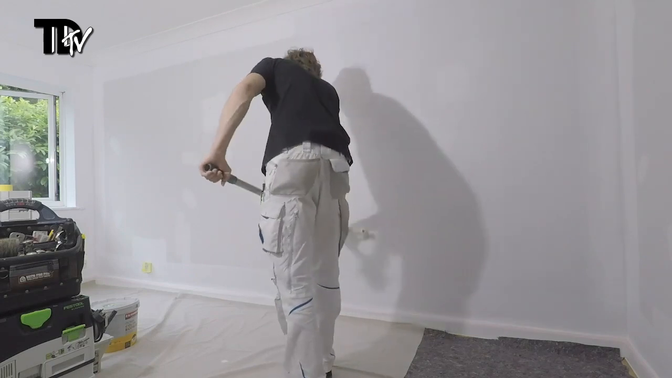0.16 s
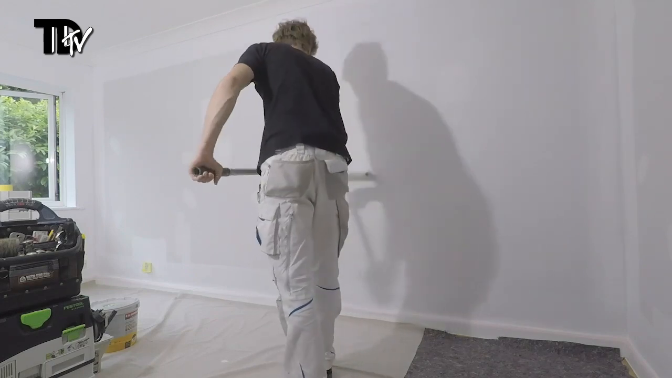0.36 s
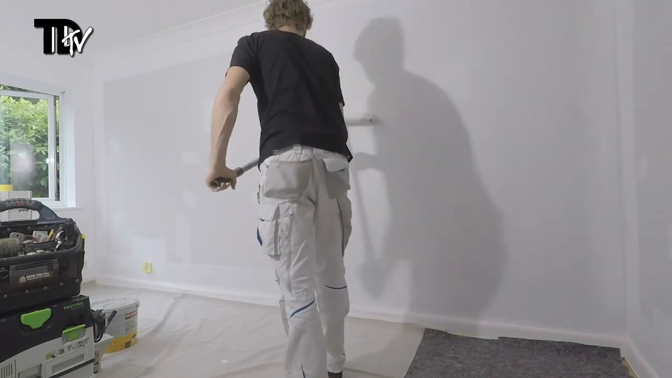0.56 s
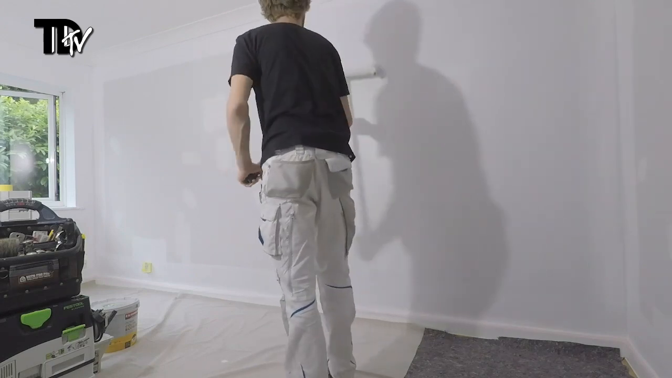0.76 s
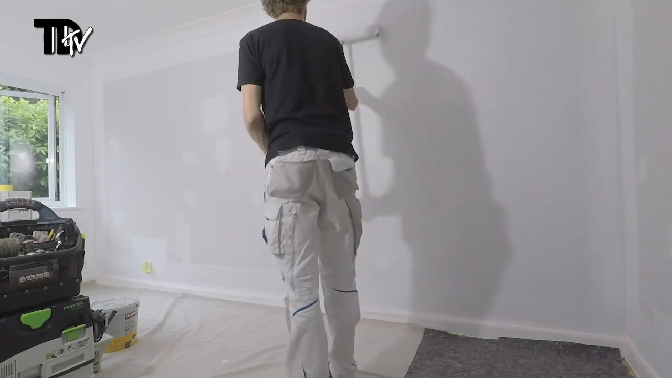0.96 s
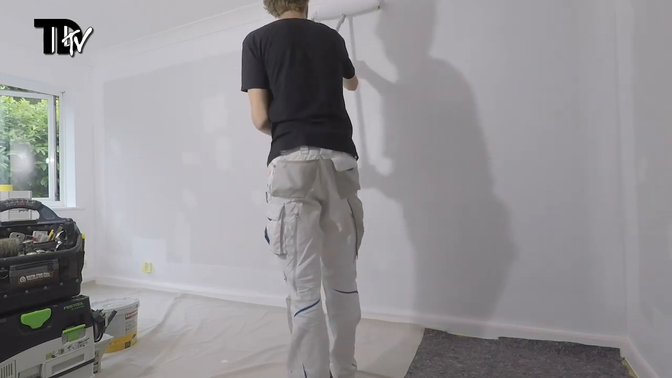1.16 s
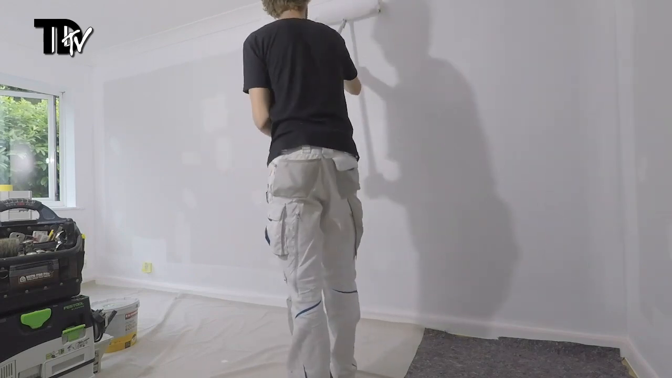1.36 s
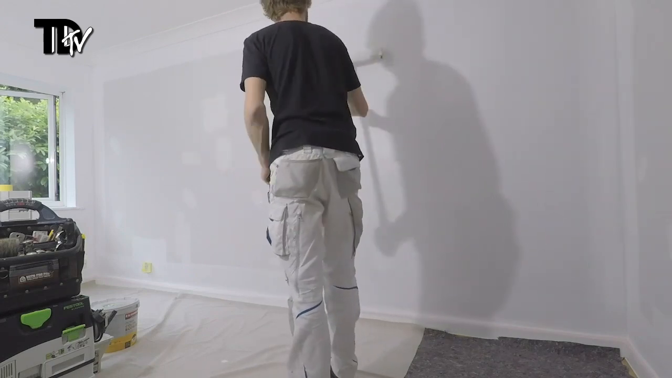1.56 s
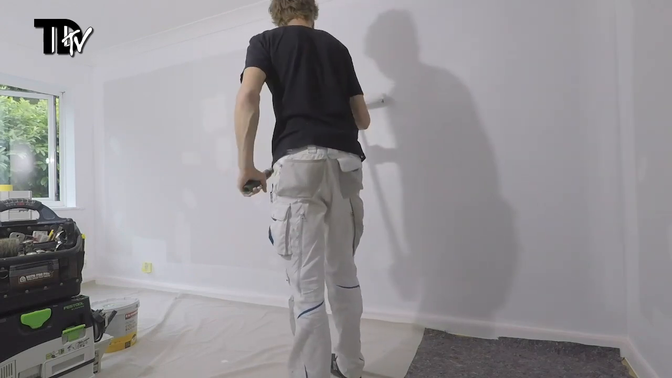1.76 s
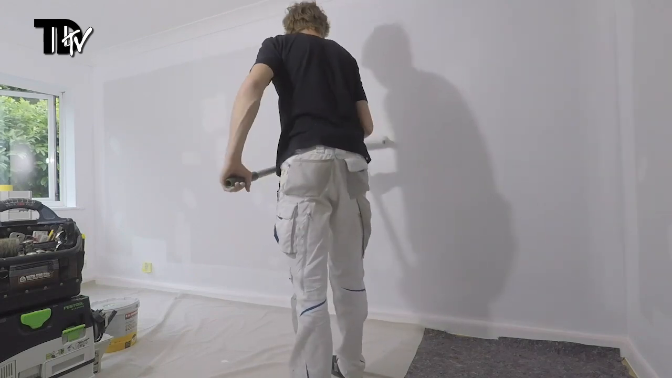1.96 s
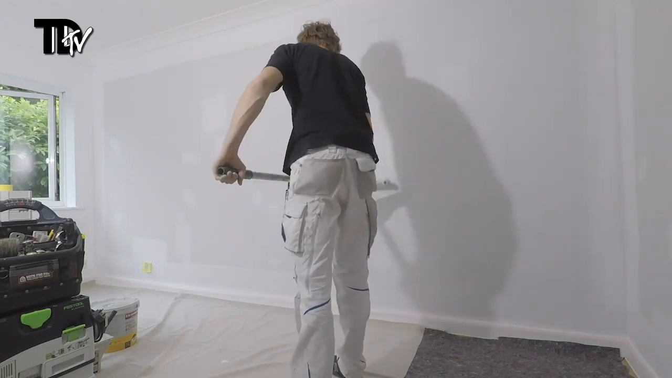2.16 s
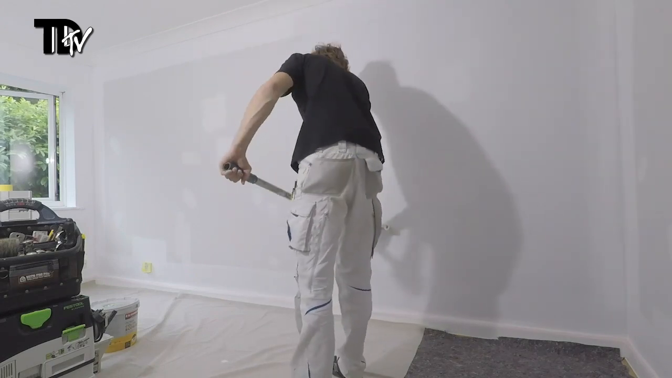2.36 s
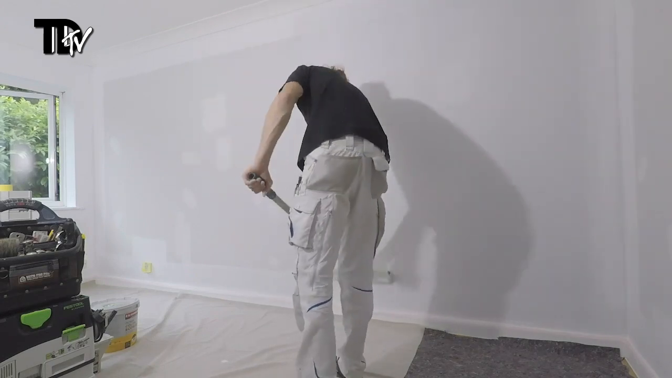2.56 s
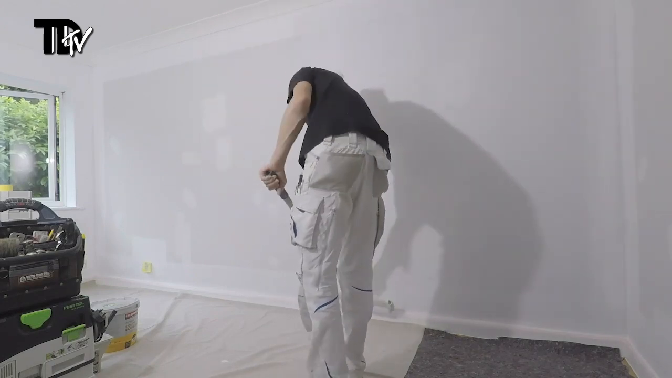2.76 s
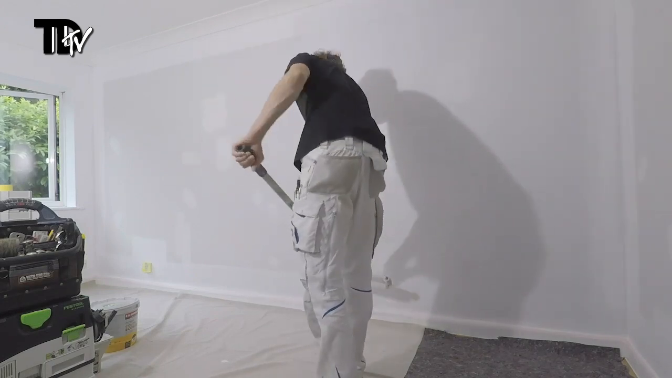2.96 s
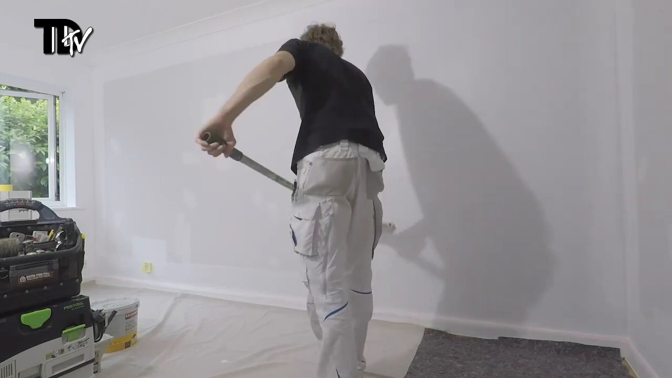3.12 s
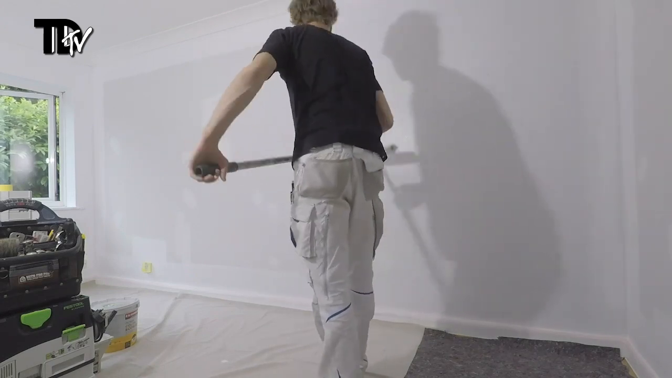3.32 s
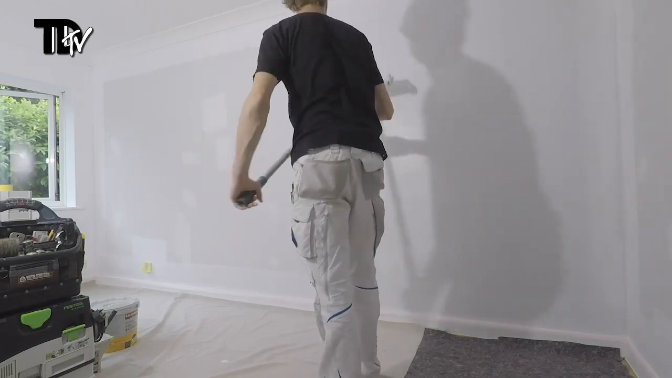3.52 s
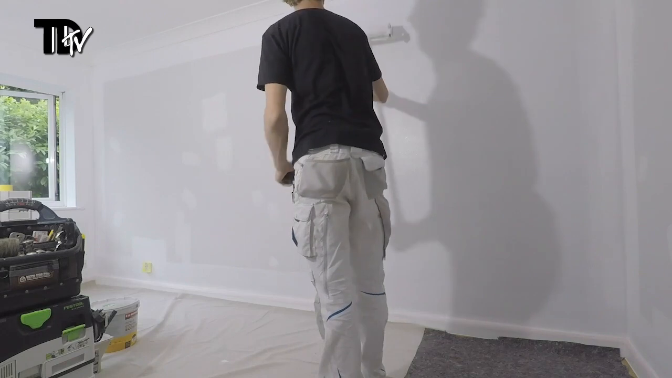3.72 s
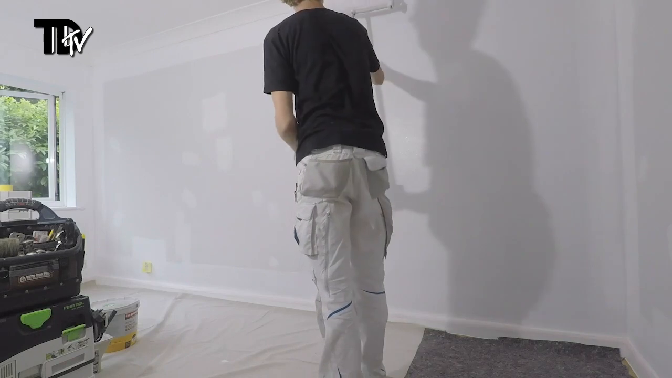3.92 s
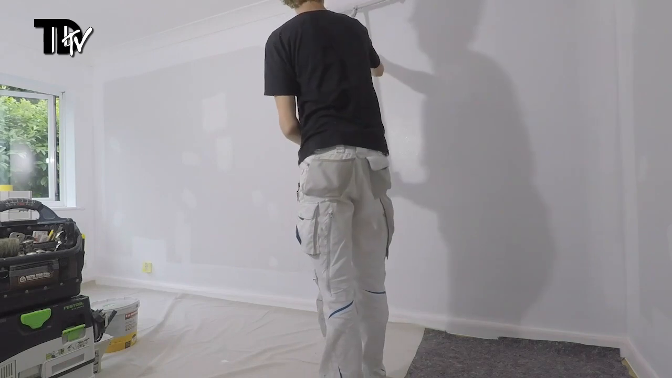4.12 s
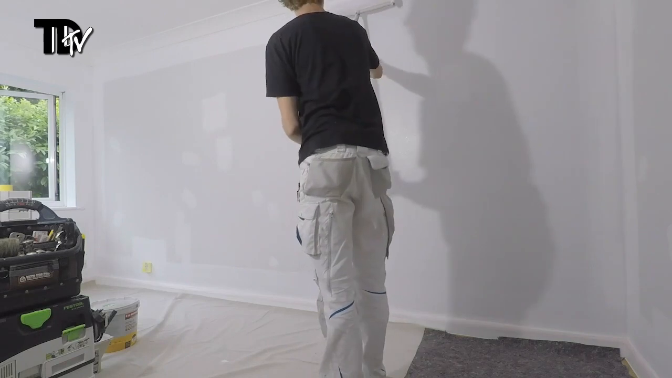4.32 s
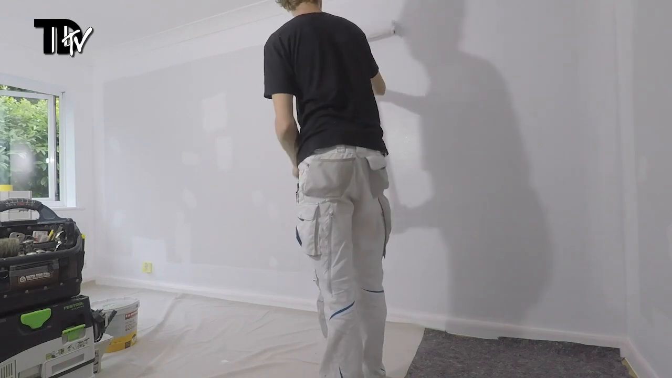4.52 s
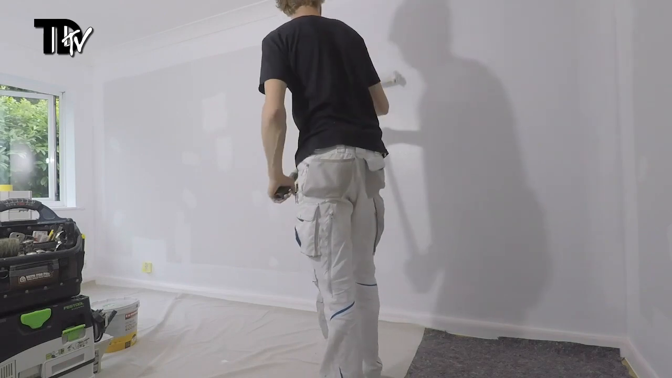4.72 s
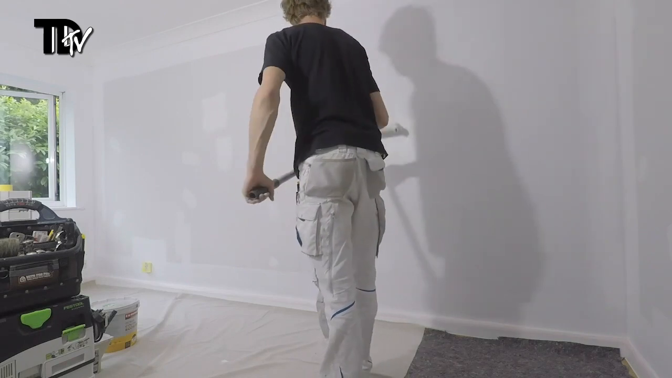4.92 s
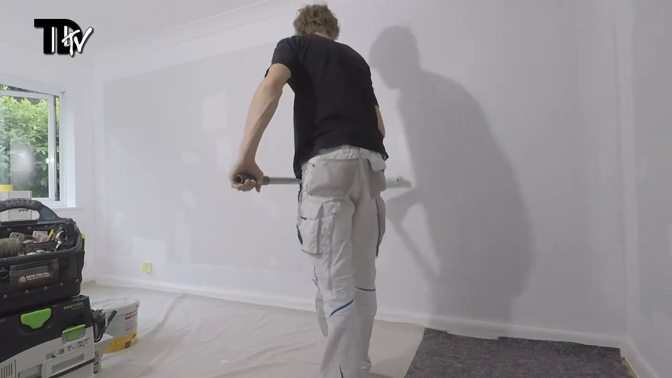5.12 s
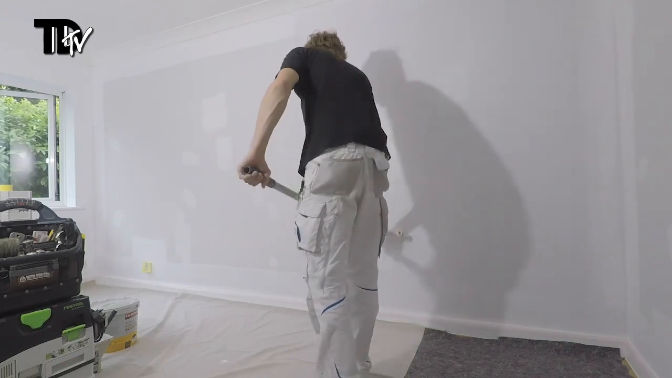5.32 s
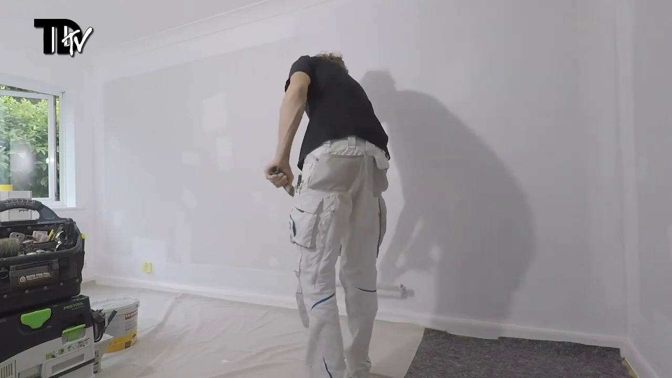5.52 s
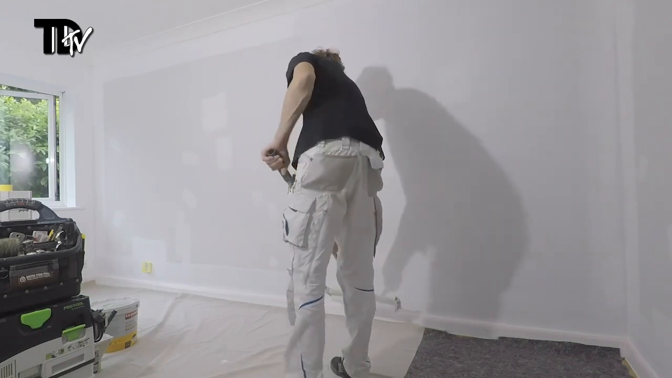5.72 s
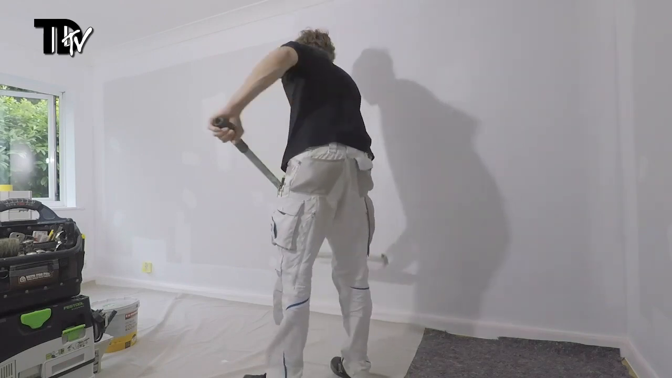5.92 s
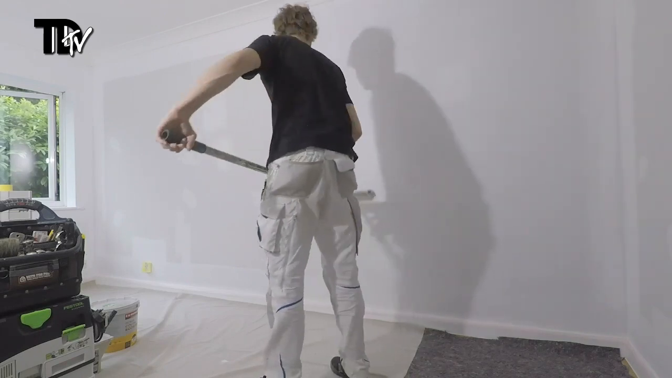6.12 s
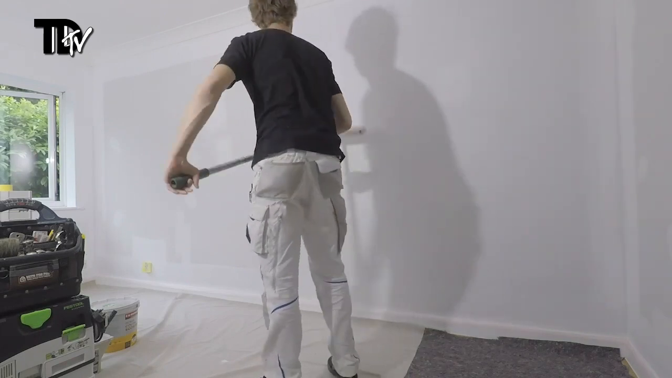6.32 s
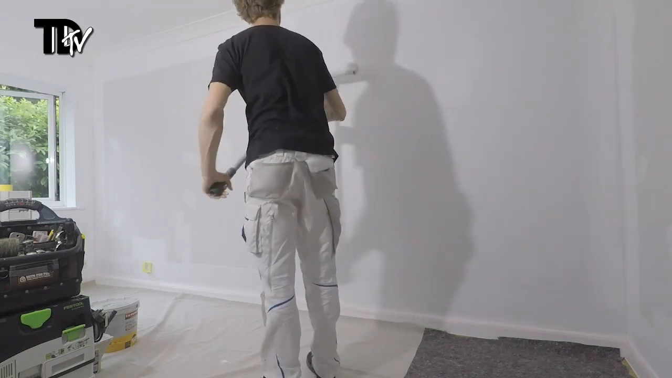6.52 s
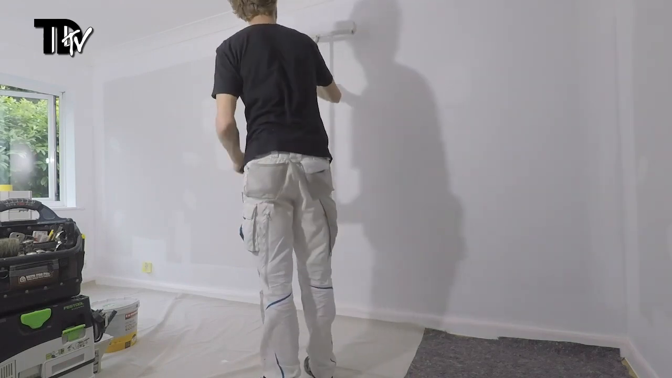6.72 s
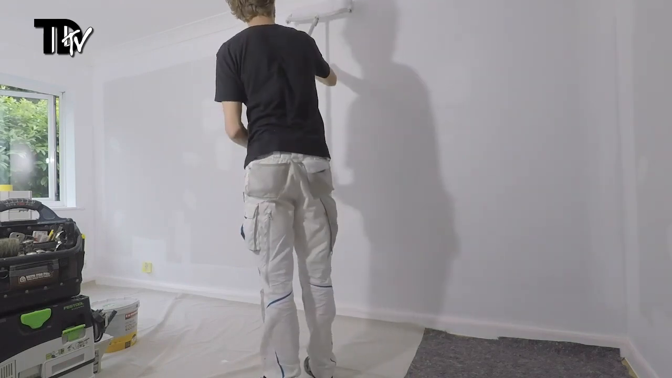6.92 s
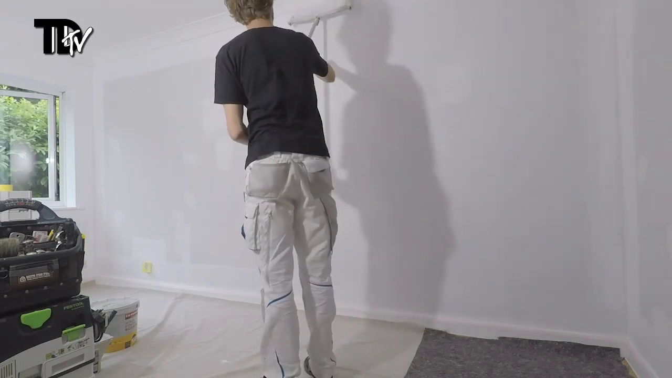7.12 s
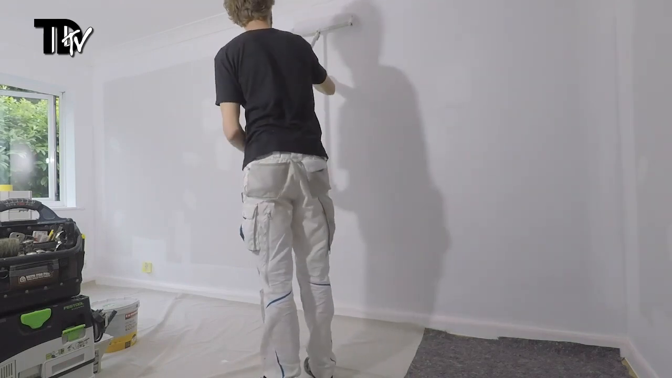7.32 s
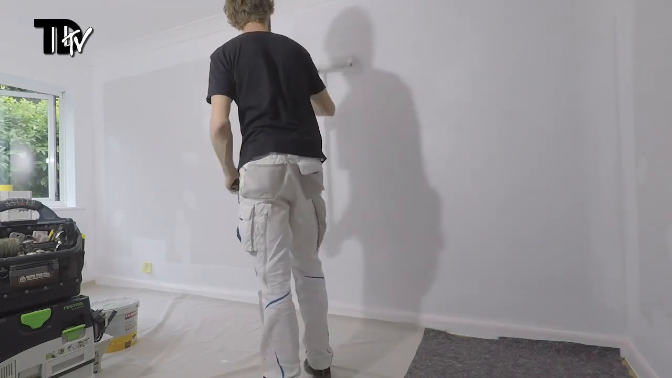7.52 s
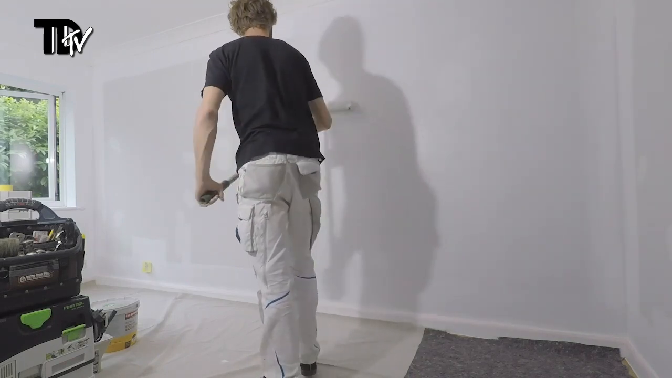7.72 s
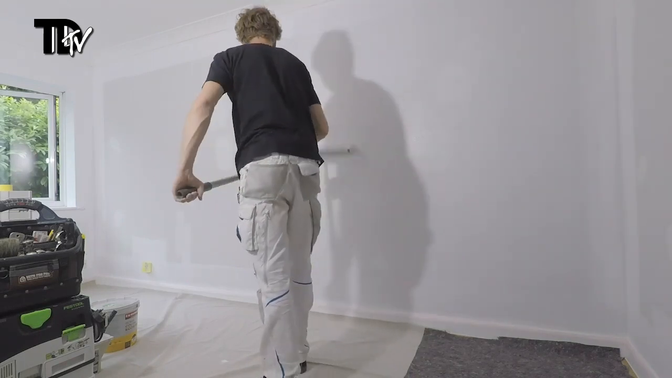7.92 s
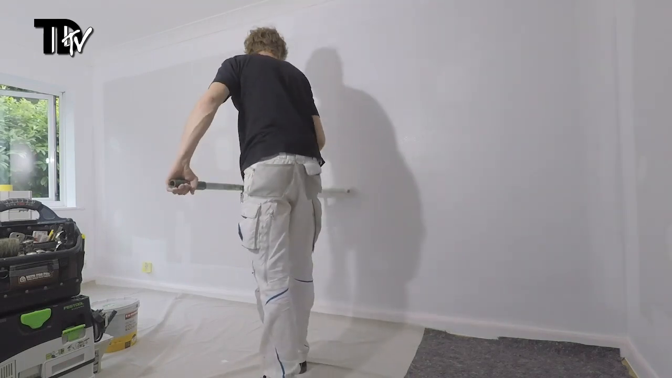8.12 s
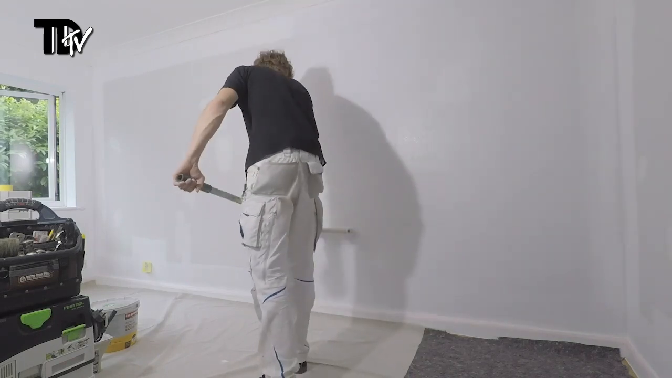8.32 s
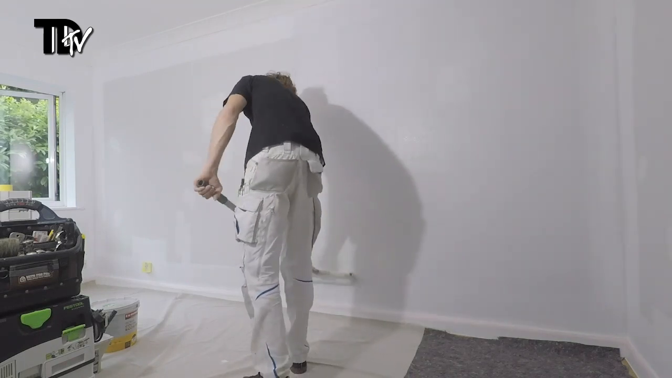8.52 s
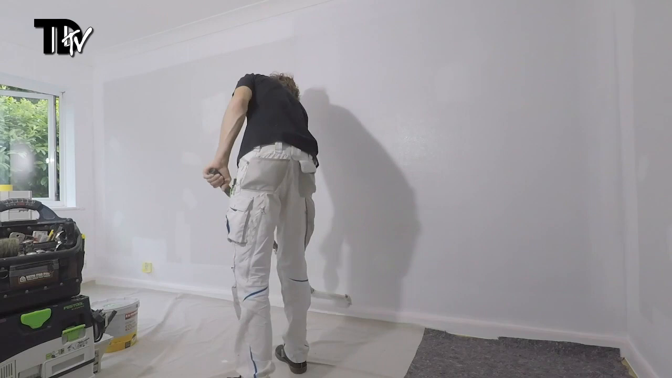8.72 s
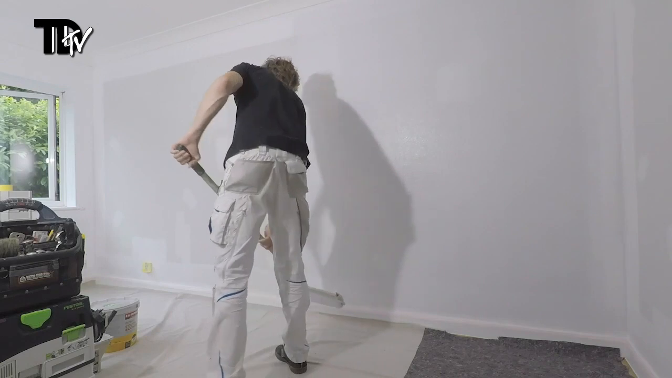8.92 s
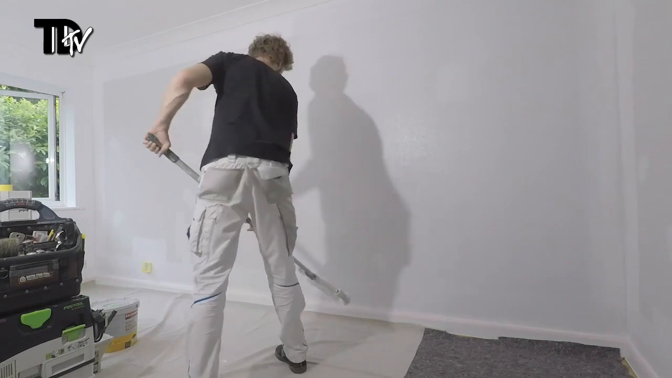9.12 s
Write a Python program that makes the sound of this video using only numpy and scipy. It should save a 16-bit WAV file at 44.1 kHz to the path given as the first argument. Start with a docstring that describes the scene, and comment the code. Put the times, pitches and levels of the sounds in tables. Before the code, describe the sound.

In a bare, slightly echoing room, a fixed microphone hears wet paint being rolled onto a wall from close by. The roller hisses and crackles through an up stroke and a down stroke, then stops for a pole bump, rustling cloth and muffled footsteps. Its frame clacks into a second down stroke and, after more steps, a third. Near the end the lifted pole gives its loudest hollow bump.

```python
"""A bare room, heard from one fixed stereo microphone, near enough for the roller to stand out of its echoes.
A decorator rolls wet paint up the wall and straight down again: paint threads snap and hiss behind the
sleeve, the nap squelches, the wall drums. At 3 s the pole bumps, cloth scuffs and he steps along the dust
sheet. The frame clacks and the sleeve slaps into a second down stroke at 4.3 s and, after more steps,
a third at 7.2 s. At 9.1 s the lifted pole gives its loudest bump."""
import sys
import numpy as np
from scipy import signal
from scipy.fft import rfft, irfft, next_fast_len
from scipy.io import wavfile

SR = 44100
rng = np.random.default_rng(int(sys.argv[2]) if len(sys.argv) > 2 else 0)


def transcribe(u):
    """Save the signal u as a 16-bit wav file named by the first command-line argument.

    u: samples, shape (n,) or (channels, n), limited to [-1, 1]; the rate is SR.
    q: integer samples, one column per channel.
    """
    v = np.clip(np.atleast_2d(u).T, -1, 1)
    q = np.round(v * 32767).astype(np.int16)
    wavfile.write(sys.argv[1], SR, q)


N = 408353
TIME = np.arange(N) / SR


def from_db(db):
    """Decibels to gain."""
    return np.exp(np.asarray(db) * (np.log(10) / 20))


def rms_one(x):
    """Scale to unit rms."""
    return x / np.sqrt(np.mean(x ** 2) + 1e-20)


def at_hz(points, hz):
    """Read a table along a log-frequency axis."""
    table = np.array(points)
    return np.interp(np.log(hz + 1e-3), np.log(table[:, 0]), table[:, 1])


def coloured(x, spectrum):
    """Give a steady sound a spectrum; rms 1."""
    size = next_fast_len(N)
    hz = np.arange(size // 2 + 1) * SR / size
    return rms_one(irfft(rfft(x, size) * from_db(at_hz(spectrum, hz)), size)[:N])


def droning(resonances):
    """Noise through parallel resonances; rms 1."""
    out = 0
    for hz, width, db in resonances:
        radius = np.exp(-np.pi * width / SR)
        poles = [1, -2 * radius * np.cos(2 * np.pi * hz / SR), radius * radius]
        noise = rng.standard_normal(N + SR // 2)
        out = out + from_db(db) * signal.lfilter([1 - radius, 0, radius - 1], poles, noise)[-N:]
    return rms_one(out)


# Room tone, the still air of the house: f/Hz, level/dB
AIR_SPECTRUM = [(15, -32), (25, -5), (86, -15.5), (118, -13), (231, -10.5), (264, -17), (344, -12.5),
                (604, -17), (655, -17), (790, -17), (952, -17.5), (1240, -20.5), (2070, -25), (2240, -25),
                (15000, -35.5)]
# Low resonances of the room: f/Hz, width/Hz, level/dB
HUM_MODES = [(38.6, 4.5, 5.5), (70, 8.4, -3.5), (96.6, 5, -5.5), (301.2, 5.5, -5.5), (348, 6, -9)]
def air():
    """Quiet air at the microphone, with the room's low hum."""
    tone = coloured(rng.standard_normal(N), AIR_SPECTRUM)
    return from_db(-46.5) * tone + from_db(-48.5) * droning(HUM_MODES)


# Faint noise in the side channel: f/Hz, level/dB
SIDE_SPECTRUM = [(30, 6), (200, -2), (450, -13), (1200, -26), (4000, -33.5), (15000, -34)]
def faint_width():
    """A very faint, mostly low noise that differs between left and right."""
    return from_db(-67) * coloured(rng.standard_normal(N), SIDE_SPECTRUM)


# Reverberation of the bare room: f/Hz, t60/s
ROOM_T60 = [(80, 0.5), (400, 0.79), (1500, 0.71), (5000, 0.77), (14000, 0.39)]
def room_echoes(first_echo_s):
    """Diffuse echoes off the bare walls, the top octave dying first; energy 1."""
    t, tail = TIME[:SR], 0
    octave_edges = 40 * 2. ** np.arange(10)
    for low, high in zip(octave_edges, octave_edges[1:]):
        octave = signal.butter(2, [low, high], "band", fs=SR, output="sos")
        t60 = at_hz(ROOM_T60, np.sqrt(low * high))
        tail = tail + signal.sosfilt(octave, rng.standard_normal(SR)) * from_db(-60 * t / t60)
    tail = tail * np.clip(t / first_echo_s - 1, 0, 1)
    return tail / np.sqrt(np.sum(tail ** 2))


def in_room(x, echoes, wet_db):
    """Direct sound plus its echoes; more echo sounds farther from the microphone."""
    return x + from_db(wet_db) * signal.fftconvolve(x, echoes)[:N]


def bell(t, peak_s, rise_s, fall_s):
    """A smooth swell from 0 to 1 and back."""
    width_s = np.where(t < peak_s, rise_s, fall_s)
    return np.exp(-np.minimum(((t - peak_s) / width_s) ** 2, 50))


# Runs of the roller over the wall: direction, touch t/s, push t/s, rise/s, slackest t/s, slack/dB,
# lift t/s, hiss level/dB, wetness/dB, flexing level/dB, extra drumming/dB
ROLLER_STROKES = [("up", -.11, -.11, 0.11, 1.32, 5.9, 1.233, -18, 1.7, -36, .6),
                  ("down", 1.337, 1.344, 0.047, 2.455, 2.8, 2.713, -19.0, 0, -41.5, -2),
                  ("down", 4.345, 4.363, 0.12, 5.37, 2.5, 5.584, -17.5, 0, -37, 2),
                  ("down", 7.195, 7.245, .119, 8.15, 0.81, 8.635, -18.5, -0.66, -36.5, -1.2)]
def stroke_gains():
    """Push, speed and height set the gains of hiss, sheen, squelch, spray, flexing and drumming."""
    touch_db, drying_db_per_s = -21.3, 1.17
    squelch_db, foot_db, spray_db, drum_db = -15, 0.66, -13.84, -41.8
    hiss_fall, sheen_fall, squelch_fall, spray_fall, wall_fall = 105, 33, 84, 196, 40  # dB/s once lifted
    t, gains = TIME[::64], 0
    for stroke in ROLLER_STROKES:
        _, touch, push, rise_s, slackest, slack_db, lift, level_db, wet_db, flex_db, extra_db = stroke
        age, lifted = np.maximum(t - push, 0), np.clip(t - lift, 0, 2)
        contact = np.clip((t - touch) / .01 + 1, 0, 1)
        # the push builds from a light touch and slackens as the arms run out of reach
        push_db = touch_db * np.exp(-age / rise_s) - slack_db * bell(t, slackest, rise_s=.43, fall_s=.15)
        # the hiss thins as the sleeve gives up its paint, and darkens as it dies
        hiss = level_db + push_db - drying_db_per_s * age - hiss_fall * lifted
        sheen = hiss - sheen_fall * lifted
        # a wetter sleeve squelches more and sprays less
        squelch = level_db + squelch_db + wet_db + foot_db * (1 - height(t))
        squelch += 1.15 * push_db - squelch_fall * lifted
        bite_db = 6.5 * np.exp(-age / .43)  # extra spray as the sleeve first bites
        spray = level_db + spray_db - wet_db / 2 + bite_db + 1.34 * push_db - spray_fall * lifted
        # the roller gathers speed and slows again; the wall is quieter when it is slow
        slow = 1 - bell(t, push + .57, rise_s=0.2, fall_s=0.4)
        load_db = 0.73 * push_db - wall_fall * lifted
        flex = flex_db - 8.5 * slow + load_db
        drum = drum_db + extra_db - 5.5 * slow + load_db
        gains = gains + contact * from_db([hiss, sheen, squelch, spray, flex, drum])
    return [np.interp(TIME, t, gain) for gain in gains]


def height(t):
    """Where the roller is on the wall: 0 at the foot, 1 at the top."""
    ends = []
    for way, _, push, _, _, _, lift, *_ in ROLLER_STROKES:
        ends += [(push, way == "down"), (lift, way == "up")]
    return np.interp(t, *np.transpose(ends))


def drift(rate):
    """A random wander that turns about rate times a second; rms 1."""
    knots = rng.standard_normal(8192)
    return rms_one(np.interp(TIME * rate, np.arange(len(knots)), knots))


def snapping(per_s, size_db):
    """Threads let go at random moments; size_db spreads the sizes of their clicks; rms 1."""
    sizes = from_db(size_db * np.minimum(rng.exponential(1, N), 6)) * rng.choice([-1, 1], N)
    return rms_one(sizes * (rng.random(N) < per_s / SR))


def hollow_note(width_hz, foot_hz=920, top_hz=730):
    """Noise rings in the tube of the sleeve, lower in pitch the higher it is on the wall; rms 1."""
    centre_hz = foot_hz + (top_hz - foot_hz) * height(TIME)
    lowpass = signal.butter(2, width_hz / 2, fs=SR, output="sos")
    slow_noise = signal.sosfilt(lowpass, rng.standard_normal((2, N)))
    phase = 2 * np.pi * np.cumsum(centre_hz) / SR
    return rms_one(slow_noise[0] * np.cos(phase) + slow_noise[1] * np.sin(phase))


# Coarse, fine and finest paint threads as they sound at the microphone: f/Hz, level/dB
SQUELCH_SPECTRUM = [(120, -15.5), (250, -8), (400, -5.5), (560, -4), (700, -1.5), (950, -2), (1300, -4.5),
                    (1900, -9.5), (3500, -26)]
HISS_SPECTRUM = [(600, -20), (1300, -13), (2000, -7.5), (2800, -4.5), (4000, -3), (4800, -2), (5800, 0),
                 (7200, -0.5), (8000, -1), (8900, -1.7), (9700, -10), (10800, -22), (13000, -36)]
SPRAY_SPECTRUM = [(8000, -34), (9800, 2), (11000, 1.5), (12800, 0.5), (14000, -2), (15200, -8),
                  (17000, -16)]
def roller(echoes, hiss, sheen, squelch, spray, sheen_hz=4240):
    """Paint threads snap as the sleeve peels off the wet wall, unevenly because the nap has clumps."""
    clumps = from_db(0.57 * drift(14) + 0.7 * drift(40) + 0.33 * drift(170))
    fine = clumps * (snapping(per_s=11000, size_db=2) + from_db(1) * rng.standard_normal(N))
    coarse = clumps * (snapping(per_s=3500, size_db=0) + from_db(-0.5) * rng.standard_normal(N))
    # movement blurs most echoes into the noise above; a weak part stays put and ripples the spectrum
    fine, coarse = in_room(fine, echoes, wet_db=-14.5), in_room(coarse, echoes, wet_db=-9.5)
    full = coloured(fine, HISS_SPECTRUM)
    dull = signal.sosfilt(signal.butter(1, sheen_hz, fs=SR, output="sos"), full)
    bright = hiss * dull + sheen * (full - dull) + spray * coloured(fine, SPRAY_SPECTRUM)
    wet_nap = from_db(-0.76) * coloured(coarse, SQUELCH_SPECTRUM)
    tube = from_db(-10.5) * hollow_note(width_hz=170)
    return bright + squelch * (wet_nap + tube)


# Resonances of the wall under the roller: f/Hz, width/Hz, level/dB
FLEX_MODES = [(39.5, 7.5, 8), (49, 8.6, 2.5), (63, 5.7, 0)]
DRUM_MODES = [(79.5, 7, 0), (103, 8, -4), (114.3, 7.6, 2.5), (169, 13, -5.5), (195.8, 13, -1)]
def wall(flex, drum):
    """The turning sleeve flexes the wall and drums on it."""
    return flex * droning(FLEX_MODES) + drum * droning(DRUM_MODES)


def struck(modes, bright_hz):
    """One blow: each mode rings with its own strength, and a soft contact mutes the upper ones; peak 1."""
    hz, db, t60 = np.transpose(modes)[:, :, None]
    t = TIME[:int(SR * min(t60.max(), 1))]
    strength = from_db(db + 2 * rng.standard_normal(hz.shape)) * rng.choice([-1, 1], hz.shape)
    blow = np.sum(strength * from_db(-60 * t / t60) * np.sin(2 * np.pi * hz * t), axis=0)
    blow = signal.sosfilt(signal.butter(2, bright_hz, fs=SR, output="sos"), blow)
    return blow / np.abs(blow).max()


def crack(low_hz, high_hz, fall_s):
    """A short burst of contact noise; peak 1."""
    band = signal.butter(2, [low_hz, high_hz], "band", fs=SR, output="sos")
    burst = signal.sosfilt(band, rng.standard_normal(SR // 8) * np.exp(-TIME[:SR // 8] / fall_s))
    return burst / np.abs(burst).max()


def add(track, s, sound):
    """Mix a sound into the track at time s."""
    start = round(s * SR)
    track[start:start + len(sound)] += sound[:N - start]


# Pole bumps at the foot of the wall: t/s, level/dB, low-pass f/Hz, tick against bump/dB
POLE_BUMPS = [(2.9924, -24.5, 520, -15), (3.06, -31, 480, -18), (9.1411, -13.5, 900, -16),
              (9.152, -19, 600, -11), (9.162, -23, 520, -24), (9.18, -17.5, 620, -10)]
# Hollow modes of pole and skirting: f/Hz, level/dB, t60/s
POLE_MODES = [(168, -18, .06), (294, -5, 0.042), (345, -6, 0.07), (400, -5, 0.065), (490, -6.5, 0.035),
              (657, -6.5, 0.032), (785, -9, 0.023), (900, -7, 0.037), (1085, -3.5, 0.035),
              (1360, -11, .025)]
def bumps():
    """The lifted pole gives a hollow knock, with a tick from the play in its joints."""
    out = np.zeros(N)
    for s, db, bright_hz, tick_db in POLE_BUMPS:
        add(out, s, from_db(db) * struck(POLE_MODES, bright_hz))
        add(out, s, from_db(db + tick_db) * crack(low_hz=2500, high_hz=11000, fall_s=.0015))
    return out


# Dust sheet, trousers and the nap grazing the wall: t/s, level/dB, rise/s, fall/s
CLOTH_SCUFFS = [(3.0, -48.5, 0.014, 0.06), (3.43, -46, 0.044, 0.063), (3.675, -42, 0.02, 0.036),
                (4.33, -44, 0.011, 0.023), (6.005, -43.5, 0.027, 0.073), (6.275, -45, 0.035, 0.049),
                (6.335, -51, .02, .045), (6.62, -45.5, .025, 0.063), (7.2, -43, 0.021, 0.055),
                (9.185, -47, 0.066, 0.059)]
# Rubbed cloth as it sounds at the microphone: f/Hz, level/dB
CLOTH_SPECTRUM = [(200, -24), (700, 1), (1500, 1.5), (3000, 2.5), (5000, 1), (8000, -1), (11000, -10.5),
                  (15000, -17)]
def scuffs():
    """Cloth fibres catch and slip in short swells."""
    t = TIME[::64]
    swell = sum(from_db(db) * bell(t, s, rise, fall) for s, db, rise, fall in CLOTH_SCUFFS)
    return np.interp(TIME, t, swell) * coloured(snapping(per_s=9000, size_db=2.5), CLOTH_SPECTRUM)


# Footfalls along the dust sheet: t/s, level/dB, low-pass f/Hz
FOOTFALLS = [(3.02, -35, 110), (3.663, -28.5, 400), (3.7, -33, 260), (3.74, -37, 110), (6.02, -36, 300),
             (6.11, -37, 260), (6.62, -34.5, 650), (6.675, -32, 260)]
# Modes of the floor beneath it: f/Hz, level/dB, t60/s
FLOOR_MODES = [(82.1, -5, 1.5), (96, -11.5, 0.46), (146.8, -2.5, 0.26), (209, 0, 0.11), (267, 1, 0.14),
               (338, -2, 0.098), (376, 3.5, .08), (467, 3, 0.069), (587, 6, 0.084), (745, -4, .05)]
def steps():
    """Soft soles set the floor booming."""
    out = np.zeros(N)
    for s, db, bright_hz in FOOTFALLS:
        add(out, s, from_db(db) * struck(FLOOR_MODES, bright_hz))
    return out


# Knocks of the frame at the end of the pole: t/s, level/dB
FRAME_CLACKS = [(3.824, -34), (3.847, -37), (4.333, -26), (4.349, -30), (6.575, -41), (7.185, -30.5),
                (7.231, -25.5), (7.25, -29)]
# Modes of the frame: f/Hz, level/dB, t60/s
FRAME_MODES = [(600, 10, 0.022), (860, -4, 0.0088), (1055, 10, 0.03), (1320, 0, .016), (1560, -8, .015),
               (1810, -11, 0.013), (2070, -21, .012), (2660, -20, .01)]
# The sleeve landing on the wall: t/s, level/dB
SLEEVE_SLAPS = [(4.343, -17.5), (7.194, -22)]
def clacks_and_slaps(clack_db, rattle_db, slap_db):
    """The loose frame clacks and rattles in its socket, and the wet sleeve slaps the wall."""
    out = np.zeros(N)
    for s, db in FRAME_CLACKS:
        add(out, s, from_db(db + clack_db) * struck(FRAME_MODES, bright_hz=2400))
        add(out, s, from_db(db + rattle_db) * crack(low_hz=840, high_hz=2090, fall_s=0.02))
    for s, db in SLEEVE_SLAPS:
        add(out, s, from_db(db + slap_db) * crack(low_hz=5000, high_hz=8800, fall_s=0.0036))
    return out


def scene():
    """One microphone position: everything is dead centre except a very faint noise at the sides."""
    echoes = room_echoes(first_echo_s=0.0026)
    hiss, sheen, squelch, spray, flex, drum = stroke_gains()
    mid = roller(echoes, hiss, sheen, squelch, spray) + wall(flex, drum) + air()
    mid += in_room(steps(), echoes, wet_db=-0.5)
    mid += from_db(-2) * in_room(bumps(), echoes, wet_db=0)
    mid += in_room(clacks_and_slaps(clack_db=-3, rattle_db=-0.5, slap_db=-2.5), echoes, wet_db=-2)
    mid += in_room(scuffs(), echoes, wet_db=-5.5)
    side = faint_width()
    return np.array([mid + side, mid - side])


def record(dry):
    """Rumble below 33 Hz is cut and, steeply, the treble above 15350 Hz."""
    low_cut = signal.butter(4, 33, "high", fs=SR, output="sos")
    high_cut = signal.ellip(12, .1, 90, 15350, fs=SR, output="sos")
    return signal.sosfilt(high_cut, signal.sosfilt(low_cut, dry))


dry = scene()
out = record(dry)
transcribe(out)
```